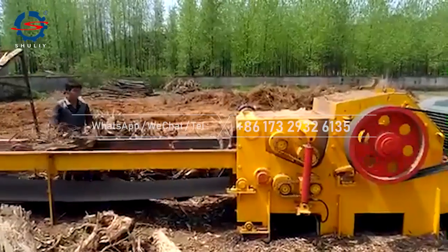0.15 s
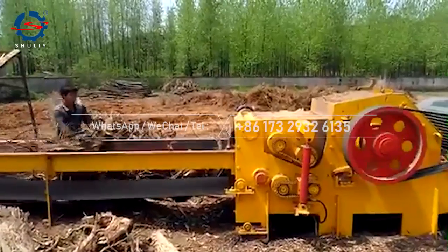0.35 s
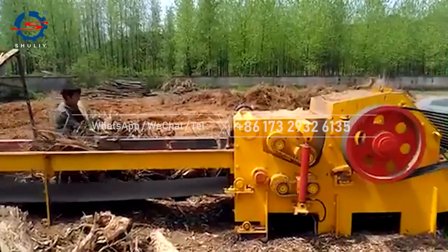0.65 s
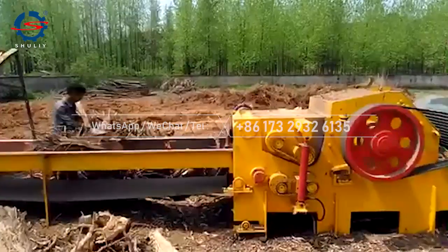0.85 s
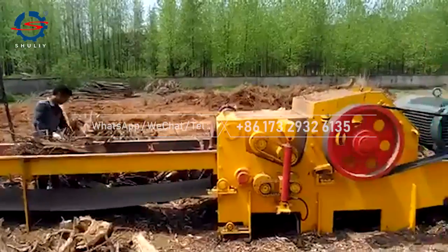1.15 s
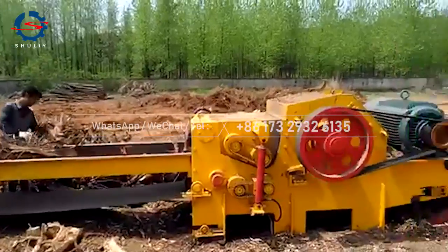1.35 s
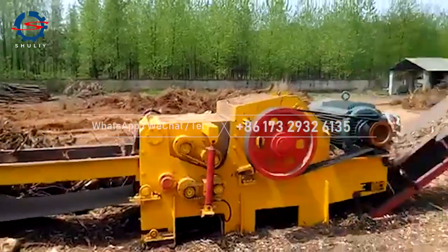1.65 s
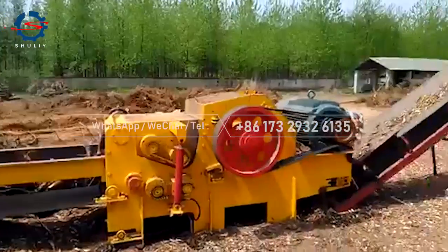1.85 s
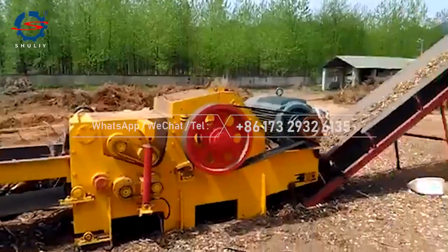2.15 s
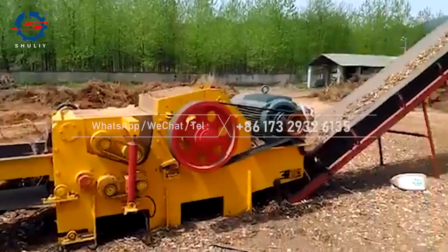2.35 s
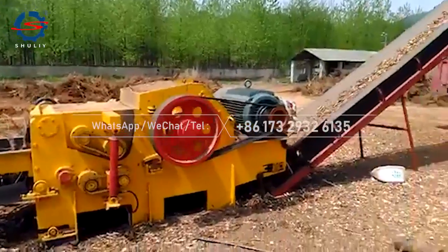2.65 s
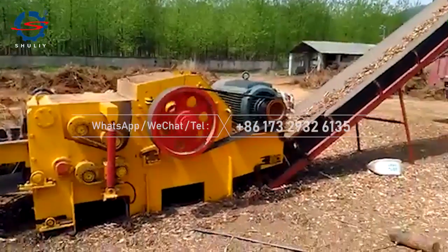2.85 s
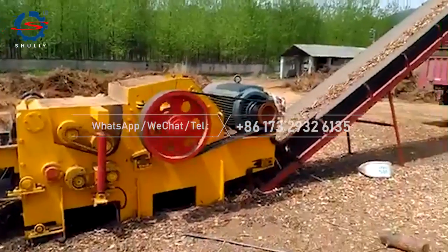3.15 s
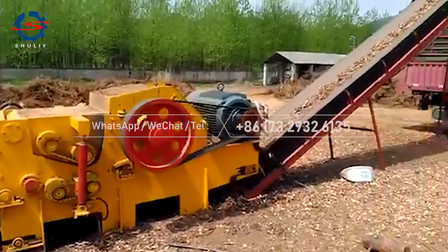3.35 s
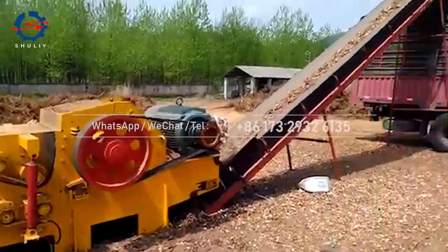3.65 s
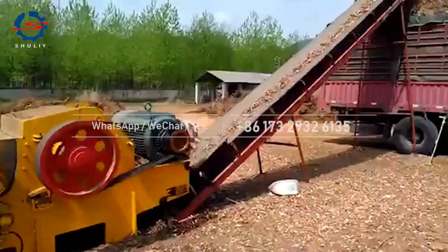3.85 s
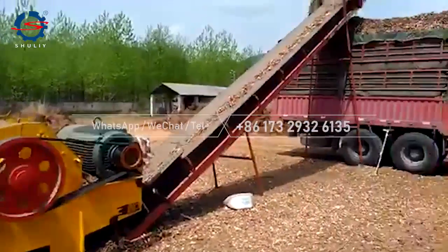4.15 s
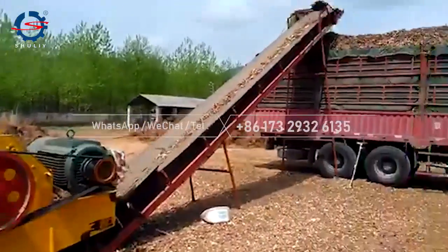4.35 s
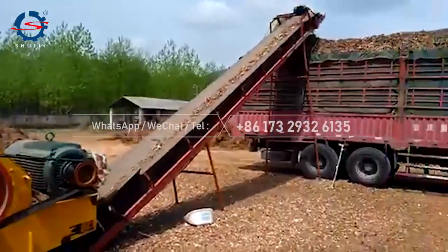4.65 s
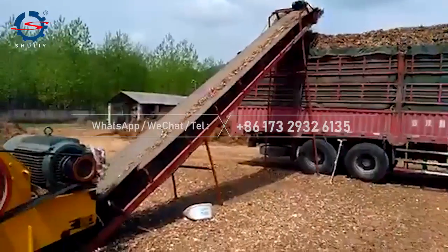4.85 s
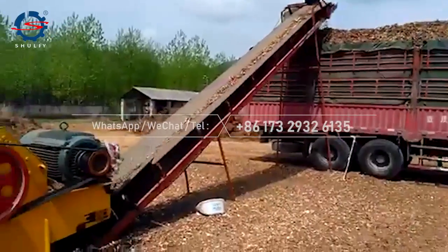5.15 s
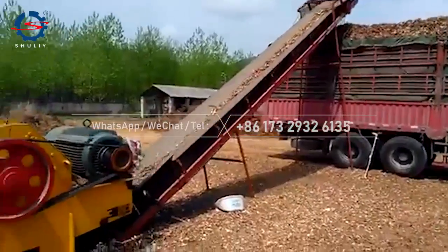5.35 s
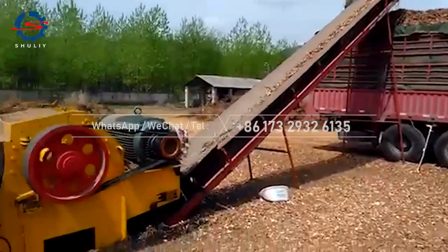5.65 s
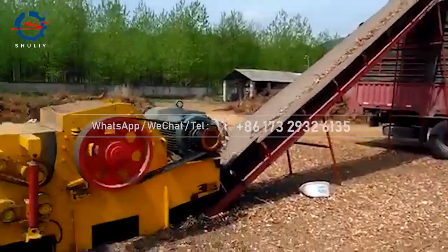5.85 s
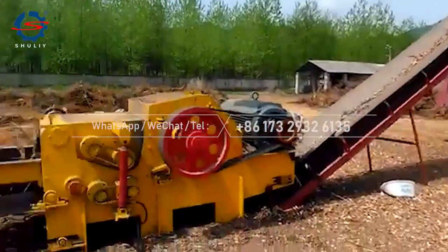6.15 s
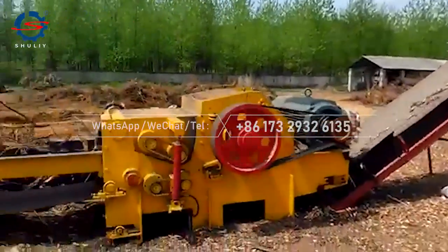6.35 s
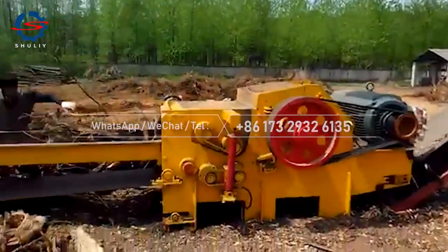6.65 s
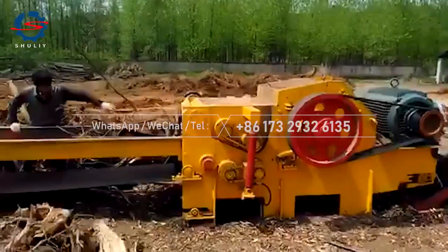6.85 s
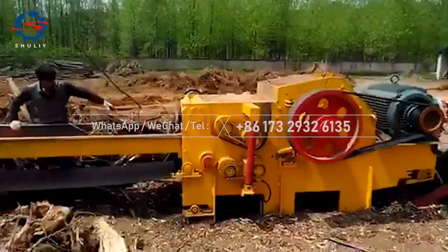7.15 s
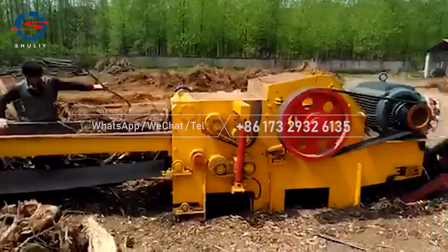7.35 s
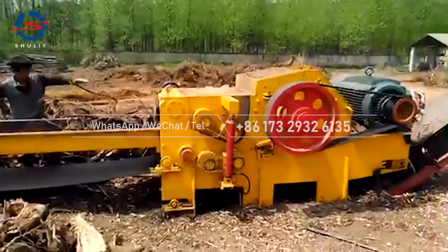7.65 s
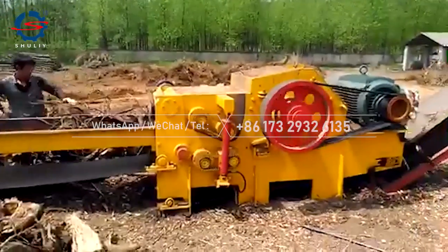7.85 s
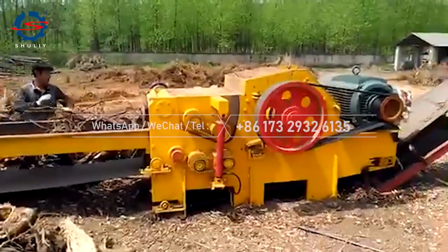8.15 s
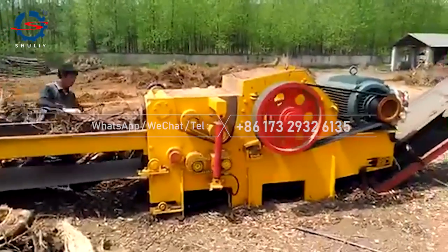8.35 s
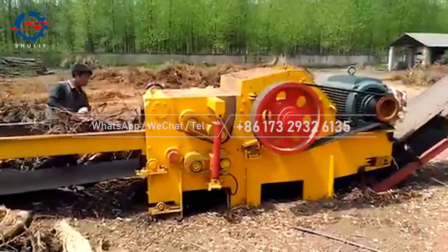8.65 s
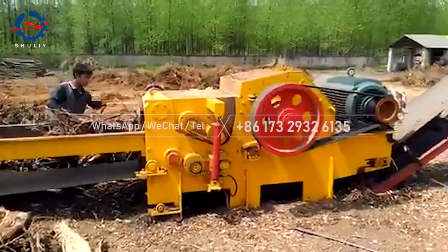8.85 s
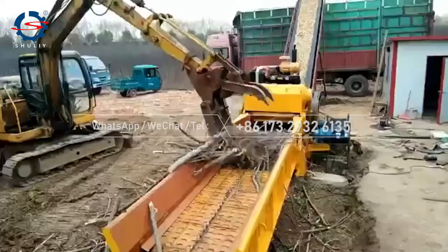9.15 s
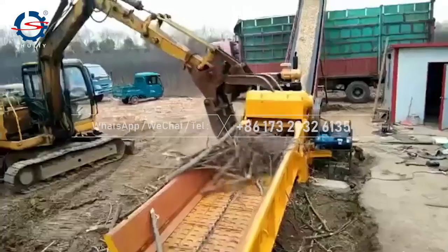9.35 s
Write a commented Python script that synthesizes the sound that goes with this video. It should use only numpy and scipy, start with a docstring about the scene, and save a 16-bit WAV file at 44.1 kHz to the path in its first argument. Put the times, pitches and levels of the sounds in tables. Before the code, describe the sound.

Dense cracking and hollow wood knocks over a low drum rumble thin out into chirping metallic squeaks and high squeals, ending in an abrupt cut.

```python
"""A drum wood chipper: chops come in bursts, each a splintering noise burst shaped by resonances of the steel casing,
with a clean ring and crackles. The knife drum throbs in multiples of the knife rate; frame rumble, churning chips
and chip spray are filtered noise. Heavy wood knocks as damped low modes. Conveyor rollers squeak and dry bearings
squeal as stick-slip tones smeared into narrow noise, below a thin high whine. The sound ends in an abrupt cut."""
import sys
import numpy as np
from scipy import signal
from scipy.fft import rfft, irfft, next_fast_len
from scipy.io import wavfile
from scipy.ndimage import uniform_filter1d, map_coordinates

SR = 44100
rng = np.random.default_rng(int(sys.argv[2]) if len(sys.argv) > 2 else 0)


def int16_out(signal):
    """Quantize to a 16-bit WAV file."""
    q = np.round(np.clip(np.atleast_2d(signal).T, -1, 1) * 32767)
    wavfile.write(sys.argv[1], SR, q.astype(np.int16))


N = 418950

# Modes of the steel casing. Each row: frequency in Hz, width in Hz, relative height in dB.
CASING_MODES = [(387, 67, 12.5), (507.6, 10, 21), (600, 58, 9.5), (733, 8.9, 3.5), (833, 110, 7),
                (917, 16, -1.5), (1124, 14, 10.5), (1300, 63, 12), (1445, 15, 14), (1596, 18, 0.5),
                (1846, 28, 5.5), (2006, 6.3, 13), (2397, 42, 10), (2530, 26, 13), (2660, 13, 10.5),
                (2912, 26, 6), (3294, 58, 5.5), (4106, 30, 9)]


def amp(db):
    """Level to gain: 20 dB are a factor of ten in amplitude."""
    return np.exp(np.asarray(db) * np.log(10) / 20)


def unit(x):
    """Normalisation to an rms of 1, so that a later gain sets the level."""
    return x / np.sqrt(np.mean(x ** 2) + 1e-20)


def along(points, hz):
    """A spectrum interpolated on a logarithmic frequency axis."""
    f, v = np.transpose(points)
    return np.interp(np.log(hz + 1), np.log(f + 1), v)


def curves(rows, t):
    """Piecewise linear courses in time, one for each column after the first."""
    s, *columns = np.transpose(rows)
    return [np.interp(t, s, column) for column in columns]


def wobble(rate, n=N):
    """Slow random modulation: a smooth spline through random knots, rate of them a second."""
    step = max(1, int(SR / rate / 12))
    at = np.arange(0, n + step, step)
    knots = rng.standard_normal(n // 30 + 4)
    coarse = map_coordinates(knots, [at * rate / SR], order=2, mode="wrap", prefilter=False)
    return np.interp(np.arange(n), at, coarse)


def filtered(x, response):
    """Linear filtering: the spectrum of x times a response of frequency."""
    m = next_fast_len(len(x) + 4096)
    spectrum = rfft(x, m) * response(np.fft.rfftfreq(m, 1 / SR))
    return irfft(spectrum, m)[:len(x)]


def hump(f, hz, width_hz, height):
    """A Lorentzian resonance curve, its height reached at hz."""
    return height / (1 + ((f - hz) / (width_hz / 2)) ** 2)


def grainy(n, lumps_db, rate):
    """Amplitude-modulated noise: white noise whose strength varies at random."""
    return rng.standard_normal(n) * amp(lumps_db * wobble(rate, n))


def patchy(x, patchy_db, size=512):
    """Random gain over time and frequency; a larger window makes its patches narrower and longer."""
    z = signal.stft(x, nperseg=size)[2]
    field = uniform_filter1d(uniform_filter1d(rng.standard_normal(z.shape), 4, 0), 6, 1)
    return signal.istft(z * amp(patchy_db * unit(field)), nperseg=size)[1][:len(x)]


def add(track, s, sound):
    """Superposition: mixes a sound into the track at time s."""
    part = track[round(s * SR):][:len(sound)]
    part += sound[:len(part)]


def bite(t, attack, length, t60):
    """Envelope of a driven, damped body: exponential rise, hold, exponential decay."""
    return (1 - np.exp(-t / attack)) * amp(-60 * np.maximum(t - length, 0) / t60)


def whistle(hz, clear, width_hz):
    """A stick-slip tone, part steady, part random sidebands; returns its complex grip and turning phase."""
    smear = [unit(wobble(width_hz, len(hz))) + 0.4 * unit(wobble(4.9 * width_hz, len(hz))) for _ in range(2)]
    grip = clear + (1 - clear) * (smear[0] + 1j * smear[1])
    return grip, np.exp(2j * np.pi * np.cumsum(hz) / SR)


def swaying_gain(rows):
    """Slow gain modulation: a given course of level plus an independent random sway."""
    sway_db, sway_per_s = 1.5, 7  # rms sway, random knots a second
    return amp(curves(rows, np.arange(N) / SR)[0] + sway_db * unit(wobble(sway_per_s)))


def chip_spray():
    """Many small chip impacts on the belt merge into high-pitched band noise."""
    # Each row: frequency in Hz, relative spectrum in dB.
    spray_spectrum = [(2350, -41.5), (4000, -18.5), (4990, -18), (5990, -11), (6780, 2), (8540, -1.5),
                      (9780, -5), (11300, -19), (13600, -28), (14500, -20)]
    # Each row: time in seconds, level in dB before the sway.
    spray_level = [(0.0, -44), (0.17, -49.5), (2.1, -49), (2.33, -46), (2.92, -46.5), (3.1, -43.5),
                   (3.44, -45.5), (3.74, -44), (5.2, -44.5), (5.28, -39.5), (6.02, -49), (6.24, -40.5),
                   (7.11, -43.5), (7.31, -51.5), (7.56, -63.5), (7.78, -37), (8.16, -45), (8.9, -46.5)]
    noise = patchy(grainy(N, lumps_db=2.6, rate=150), patchy_db=3.5)
    spray = filtered(noise, lambda f: amp(along(spray_spectrum, f)))
    return swaying_gain(spray_level) * unit(spray)


def chip_churn():
    """Chips churning in the casing: broadband excitation coloured by the casing's resonances."""
    # Each row: frequency in Hz, relative spectrum in dB.
    churn_spectrum = [(88, -25.5), (150, 4.5), (201, -5.5), (345, -4), (435, -15.5), (819, -12),
                      (1520, -22), (2770, -22), (3660, -24), (5300, -47), (6000, -47), (7800, -90.5),
                      (13200, -120)]
    # Each row: time in seconds, level in dB before the sway.
    churn_level = [(0.0, -26.5), (0.37, -26), (1.19, -38), (2.23, -33.5), (2.53, -29.5), (2.65, -33.5),
                   (3.02, -28), (3.22, -35), (3.64, -31), (3.87, -36.5), (4.46, -35), (4.64, -36),
                   (5.95, -37.5), (6.69, -39), (7.06, -39.5), (8.21, -37.5), (8.38, -37), (8.9, -36)]

    def colour(f):
        """Resonant colouring: the broad spectrum with softened casing modes."""
        return amp(along(churn_spectrum, f) + 0.43 * sum(hump(f, *mode) for mode in CASING_MODES))

    noise = patchy(grainy(N, lumps_db=1.5, rate=56), patchy_db=4, size=2048)
    return swaying_gain(churn_level) * unit(filtered(noise, colour))


def knife_drum():
    """A periodic force: harmonics of the knife rate, and frame rumble modulated at the same rate."""
    # Each row: multiple of the knife rate, relative level in dB.
    throb_partials = [(1, -29), (2, -1), (3, 7.5), (4, 3), (5, -16), (6, -17.5), (7, -2.5), (8, -4.5),
                      (9, -21)]
    # Each row: time in seconds, level of the throb in dB.
    throb_level = [(0, -33), (1.5, -30), (3, -34), (4.5, -32.5), (6, -32), (7.5, -30), (9, -32)]
    # Each row: frequency in Hz, relative spectrum in dB.
    rumble_spectrum = [(20, -12.5), (45, -9), (75, -1.5), (103, 2.5), (140, -8.5), (200, -14), (300, -17),
                       (500, -72.5)]
    # Each row: time in seconds, level of the frame rumble in dB before the sway.
    rumble_level = [(0.0, -28.5), (0.58, -25), (0.75, -31), (0.9, -21.5), (1.31, -31), (1.61, -27.5),
                    (1.66, -41), (1.96, -29), (2.72, -31.5), (2.94, -26.5), (3.24, -39), (3.37, -37),
                    (3.95, -41), (3.97, -28), (4.93, -39), (7.47, -30), (7.77, -33.5), (7.87, -24),
                    (8.3, -28), (8.37, -54), (8.6, -23), (8.75, -38), (9.0, -40.5), (9.03, -44)]
    knife_hz = 18.72  # mean knife passes a second
    t = np.arange(N) / SR
    turns = knife_hz * t + 0.014 * wobble(4.0)  # in knife passes, slightly uneven
    throb = sum(amp(db + 1.3 * wobble(2.7)) * np.sin(2 * np.pi * k * turns) for k, db in throb_partials)
    pulse = 1 + 0.55 * np.cos(2 * np.pi * (turns - 0.3))
    noise = patchy(grainy(N, lumps_db=0.5, rate=37), patchy_db=3, size=4096)
    rumble = filtered(noise * pulse, lambda f: amp(along(rumble_spectrum, f)))
    return amp(curves(throb_level, t)[0]) * unit(throb) + swaying_gain(rumble_level) * unit(rumble)


def whine():
    """A narrow-band tone under random frequency and amplitude modulation: it wavers, comes and goes."""
    # Each row: time in seconds, pitch in Hz before its shiver, level in dB before its flutter.
    whine_course = [(1.6, 14000, -86.5), (1.69, 13400, -47.5), (2.0, 13460, -53), (2.04, 13430, -73),
                    (2.49, 12600, -80.5), (2.7, 13400, -54), (3.01, 13100, -45.5), (3.37, 13200, -64),
                    (4.0, 12900, -54.5), (4.419, 12939, -63), (4.59, 13150, -48), (4.78, 13460, -86),
                    (4.909, 13200, -45.5), (5.2, 13500, -58), (5.39, 12935, -51.5), (5.83, 13350, -68.5),
                    (6.11, 13150, -53), (6.55, 13040, -47.5), (7.28, 13105, -70), (7.43, 13321, -114),
                    (7.77, 13000, -47), (8.25, 13100, -65.5), (8.38, 13033, -65), (8.44, 13540, -81)]
    out, t = np.zeros(N), np.arange(whine_course[0][0], whine_course[-1][0], 1 / SR)
    hz, db = curves(whine_course, t)
    grip, turn = whistle(hz * (1 + 0.004 * unit(wobble(18, len(t)))), clear=0.4, width_hz=260)
    flutter_db = 3.9 * unit(wobble(16, len(t)))
    add(out, t[0], amp(db + flutter_db) * unit(np.real(grip * turn)))
    return out


def squeals():
    """Stick-slip in dry bearings: gliding notes swell to a crest and sink; the higher, the fuzzier."""
    # Each row: start in seconds, swell in seconds, fade in seconds, first pitch in Hz, last pitch in Hz,
    # crest level in dB before the flutter, rise to the crest in dB, fall after it in dB.
    squeal_notes = [(3.003, 0.057, 0.24, 6850, 6820, -28.5, 18, 18),
                    (3.149, 0.092, 0.23, 5640, 5330, -28, 11, 5.5),
                    (3.426, 0.029, 0.11, 5310, 5330, -24.5, 2, 29),
                    (4.409, 0.12, 0.35, 6990, 6780, -28.5, 14, 3),
                    (4.791, 0.11, 0.15, 6890, 6780, -28, 3, 1),
                    (4.678, 0.19, 0.15, 5700, 5510, -31.5, 15, 2.5),
                    (5.005, 0.079, 0.43, 5570, 5450, -31.5, 1, 15),
                    (5.001, 0.098, 0.11, 6820, 6960, -25.5, 12, 16.5),
                    (5.048, 0.16, 0.08, 11000, 11900, -42.5, 4.5, 12),
                    (5.17, 0.099, 0.013, 7000, 6800, -24, 11, 6),
                    (5.278, 0.022, 0.15, 6730, 6840, -26.5, 3, 9),
                    (5.509, 0.02, 0.11, 7020, 6960, -30, -5, 19),
                    (6.53, 0.027, 0.14, 11600, 10900, -35, 25, 19),
                    (6.752, 0.065, 0.049, 6350, 6500, -24.5, 19, -5),
                    (6.86, 0.069, 0.12, 6620, 6960, -22.5, 17.5, 12),
                    (7.061, 0.11, 0.17, 6860, 6850, -28, 9, 31),
                    (7.085, 0.027, 0.12, 5450, 5500, -28, 16, 20),
                    (7.062, 0.0067, 0.017, 6800, 6800, -24, 17, 1),
                    (7.603, 0.048, 0.033, 7530, 7550, -22.5, 26, 29),
                    (7.7, 0.021, 0.058, 6830, 7300, -33, 3, 2),
                    (7.845, 0.0094, 0.035, 7950, 7750, -24, 4, 6),
                    (7.879, 0.016, 0.045, 7600, 7850, -26.5, 6, 26),
                    (7.972, 0.02, 0.064, 11800, 11630, -40, 15, 4),
                    (7.998, 0.012, 0.018, 7150, 7100, -34.5, 5, 7),
                    (8.02, 0.011, 0.018, 6750, 6650, -35, 2.5, 5),
                    (8.103, 0.012, 0.015, 6200, 6100, -29, 0, 5),
                    (8.072, 0.03, 0.075, 11700, 12000, -36, 4, 21),
                    (8.286, 0.033, 0.015, 6980, 6850, -30.5, 22, 3),
                    (8.343, 0.016, 0.036, 7150, 7000, -31, 6, 11),
                    (8.409, 0.017, 0.064, 6950, 6950, -32, -1, 14),
                    (8.591, 0.013, 0.026, 7060, 6850, -29, 6, 19),
                    (8.64, 0.024, 0.023, 6910, 6970, -30.5, 10, 10),
                    (8.945, 0.085, 0.034, 7070, 6810, -26, 16, 4)]
    flutter_db, jitter = 3, 0.0049  # rms unsteadiness of the grip; rms share of the pitch
    out = np.zeros(N)
    for start, swell, fade, first_hz, last_hz, db, rise_db, fall_db in squeal_notes:
        end = swell + fade
        t = np.arange(0, end + .1, 1 / SR)
        stray = 0.006 * wobble(10, len(t)) + jitter * unit(wobble(60, len(t)))  # slow drift and shiver
        hz = np.interp(t, [0, end], [first_hz, last_hz]) * (1 + stray)
        swell_db = np.interp(t, [0, swell, end], [db - rise_db, db, db - fall_db])
        swell_db += flutter_db * unit(wobble(44.7, len(t)))
        edges = np.clip(np.minimum(t, end - t) / 0.01, 0, 1)
        grip, turn = whistle(hz, clear=0.58, width_hz=200 * (first_hz / 6000) ** 1.4)
        add(out, start, amp(swell_db) * edges * unit(np.real(grip * turn)))
    return out


def squeaks():
    """Stick-slip: a roller catches with a scrape, its pitch sinks to a note, and the frame resonates."""
    # Each row: start in seconds, nominal peak level in dB, settled pitch in Hz,
    # scrape over the note in dB, length in seconds.
    squeak_notes = [(3.056, -10, 3526, -5.5, 0.018), (3.076, -2.5, 3483, -17, 0.026),
                    (3.112, -14, 3470, -5, 0.026), (3.41, -5, 3510, -15.5, 0.03),
                    (3.592, -6.5, 3485, -10, 0.039), (3.598, -19, 5010, -18.5, 0.017),
                    (3.595, -21.5, 5400, -16, 0.012), (3.751, -6, 3515, -10.5, 0.07),
                    (3.913, -17.5, 3550, 0.5, 0.035), (4.121, -9, 3460, -10, 0.042),
                    (4.244, -24.5, 3690, -25.5, 0.061), (4.286, -5.5, 3440, -12, 0.045),
                    (4.464, -16, 3530, -5.5, 0.012), (4.576, -20.5, 3950, -7, 0.014),
                    (4.624, -11, 3780, -6.5, 0.022), (4.649, -4.5, 3467, -20, 0.035),
                    (5.171, -2.5, 3505, -32, 0.042), (5.505, -8, 3500, -11.5, 0.073),
                    (5.701, -0.5, 3530, -17, 0.034), (5.709, -21, 3980, -36, 0.025),
                    (5.723, -12, 4260, -18, 0.011), (5.851, -20.5, 3620, -2.5, 0.05),
                    (5.859, -15, 3780, -17, 0.012), (6.018, -14.5, 3580, 1.5, 0.12),
                    (6.029, -18, 5200, -45, 0.027), (6.044, -11.5, 3810, -24, 0.019),
                    (6.057, -16.5, 3970, -23, 0.012), (6.095, -20.5, 4880, -21, 0.021),
                    (6.06, -3.5, 3470, -11.5, 0.029), (6.199, -5.5, 3690, -23.5, 0.024),
                    (6.217, -3, 3730, -19.5, 0.0042), (6.247, -17, 3710, -25, 0.009),
                    (6.382, -13, 3665, -8.5, 0.021), (6.402, -8.5, 3514, -9, 0.033),
                    (6.41, -17, 4400, -21, 0.016), (6.567, -3, 3770, -17.5, 0.0042),
                    (6.922, -12, 3600, 0, 0.021), (6.94, -3.5, 3487, -17, 0.033),
                    (6.957, -18, 4800, -6.5, 0.017), (7.105, -20, 3930, -6, 0.015),
                    (7.111, -5, 3520, -14.5, 0.039), (7.519, -17.5, 3595, -2.5, 0.013),
                    (7.521, -29, 4850, -7, 0.013), (7.998, -31.5, 4820, -9, 0.014),
                    (7.642, -13.5, 3770, -14.5, 0.0076), (7.695, -12, 3506, -10, 0.026),
                    (7.829, -11.5, 3700, -19, 0.0089), (7.985, -13, 3740, -8, 0.015),
                    (8.245, -26, 3820, -11, 0.0078), (8.252, -23, 3130, -5, 0.01),
                    (8.333, -17, 3670, -8, 0.0081), (8.353, -12.5, 3530, -6.5, 0.017)]
    crest_db = 6.5  # peak of note, ring and scrape together over the note alone
    clear_s = 0.045  # a shorter squeak never settles into a clean note
    catch_share, catch_s = 0.41, 0.029  # attack as a share of the length, and its limit
    frame_hz, frame_width_hz = 3510, 400  # the frame rings out mostly notes near its own pitch
    out, t = np.zeros(N), np.arange(SR // 3) / SR
    for s, db, hz, scrape_db, length in squeak_notes:
        upper_hz = rng.uniform(3655.6, 5210)  # where the second contact scrapes
        t60 = 0.29 + 3.5 * length  # a longer squeak rings longer
        settled = np.clip(length / clear_s, .3, 1)
        sinking_hz = hz * (1 + 0.04 * np.exp(-t / 0.00742))
        grip, turn = whistle(sinking_hz, clear=0.93 * settled, width_hz=90 / settled)
        blur = 0.25 + 0.32 * unit(wobble(232.5, len(t)))  # the ringing frame beats unevenly

        def scrape_band(f):
            """Contact resonances over a noise floor, with a treble roll-off."""
            contacts = hump(f, 1.012 * hz, 680, 35.8) + hump(f, upper_hz, 410, 18.6)
            treble = hump(f, 7030, 1200, 22) + hump(f, 9540, 4700, 11)
            return amp(-46 + contacts + treble) / (1 + (f / 11800) ** 8)

        scrape = unit(filtered(grainy(len(t), lumps_db=3.5, rate=110), scrape_band))
        scrape *= amp(scrape_db) * bite(t, 0.0096, 0.0022, t60)
        attack = min(catch_share * length, catch_s)
        note = bite(t, attack, length, 0.1 * settled) * grip * (turn + amp(-14) * turn ** 2)  # with octave
        frame_gain = hump(hz, frame_hz, frame_width_hz, 0.42)
        ring = frame_gain * bite(t, 0.021, length, t60) * blur * turn
        add(out, s, amp(db - crest_db) * ((note + ring).real + scrape))
    return out


def thuds():
    """Impulse response of heavy wood: a log end strikes the feed table and two low modes die quickly."""
    # Each row: start in seconds, level in dB, pitch of the upper mode in Hz.
    knocks = [(0.552, -10, 184), (0.821, -2.5, 237), (2.037, -12, 267), (1.298, -21, 282), (1.416, -2, 340),
              (2.74, -8, 117), (2.941, -6, 140), (3.115, -6.5, 307), (3.382, -9.5, 135), (3.492, -5.5, 392),
              (3.996, 1.5, 392), (4.032, -7.5, 294), (4.229, -8.5, 267), (6.673, -11, 260),
              (6.892, -15.5, 262), (6.976, -24, 137), (7.813, -8, 121.4), (8.116, -15.5, 271),
              (8.316, -10, 305), (8.365, -9.5, 300), (8.61, -14, 139.6), (8.796, -14, 309),
              (8.829, -9.5, 114)]
    decay_cycles = 24  # swings of the upper mode until a knock has decayed by 60 dB
    out, t = np.zeros(N), np.arange(SR // 4) / SR
    for s, db, hz in knocks:
        pair = 0.41 * np.sin(2 * np.pi * hz * t) + 0.27 * np.sin(2 * np.pi * 0.814 * hz * t)
        add(out, s, amp(db) * bite(t, 0.005, 0.0046, decay_cycles / hz) * pair)
    return out


def crackle(n, weights, t60, count):
    """Modal impacts: single splinters strike ever more weakly, each ringing one slightly mistuned mode."""
    stray, spread_db = 0.054, 2.5  # largest share of pitch; dB per natural-log unit of the draw
    longest_t60, shortening_db = 0.057, 13  # s; the shortest ring is this many dB shorter
    u, draw = np.arange(SR // 40) / SR, rng.uniform(0, 1, (count, 5))
    mode = (draw[:, 0] * len(CASING_MODES)).astype(int)
    hz = np.array(CASING_MODES)[mode, 0] * (1 + stray * (2 * draw[:, 1] - 1))
    late = draw[:, 2] * min(t60 / 2, n / SR - u[-1] - 1 / SR)
    size = weights[mode] * amp(-60 * late / t60 - spread_db * np.log(draw[:, 3] + .08))
    life = amp(-shortening_db * draw[:, 4:])  # some ring, some only snap, and those the harder
    envelope = bite(u, 0.002 * life, 0, longest_t60 * life) * (1 - u / u[-1])
    rings = size[:, None] / np.sqrt(life) * envelope * np.sin(2 * np.pi * hz[:, None] * u)
    at = (late * SR).astype(int)[:, None] + np.arange(len(u))
    return np.bincount(at.ravel(), rings.ravel(), n)[:n] / np.sqrt(np.mean(weights ** 2))


def casing_knock(u, gains):
    """Modal synthesis: damped casing modes, each struck with a random strength and sign."""
    wood_damps_hz = 25.2  # wood pressed on the casing widens its modes
    knock = np.zeros(len(u))
    for gain, (hz, width_hz, _) in zip(gains, CASING_MODES):
        mistuned_hz = hz * (1 + 0.0084 * rng.standard_normal())
        decay = np.exp(-np.pi * (width_hz + wood_damps_hz) * u)
        knock += gain * rng.uniform(-0.76, 1) * decay * np.sin(2 * np.pi * mistuned_hz * u)
    return (1 - np.exp(-u / 0.00078)) * knock / knock[:SR // 50].std()


def chops():
    """Source and resonator: a snap and splintering noise excite casing modes at random strengths."""
    # Each row: start in seconds, nominal peak level in dB, loudest ring in Hz, how far it stands out in dB,
    # brightness in dB per octave, nominal 60 dB decay in seconds.
    chop_rows = [(0.004, -7.5, 2160, 6, 2, 0.51), (0.091, -19.5, 682, 11, 2, 0.79),
                 (0.122, -16.5, 1610, 8, 5, 0.36), (0.149, -10, 2440, 11, 2.5, 0.46),
                 (0.175, -11, 2060, 11, 5.5, 0.58), (0.229, -10.5, 673, 12, 2, 0.34),
                 (0.315, -9, 727, 12.5, 0.5, 0.2), (0.358, -10.5, 2950, 13.5, -4, 0.5),
                 (0.392, -10, 3090, 11, 2, 0.44), (0.409, -6, 2330, 6.5, 1.5, 0.3),
                 (0.441, -13.5, 1884, 12.5, 1.5, 0.61), (0.468, -9, 1206, 13, 4, 0.35),
                 (0.495, -12, 3000, 3.5, 2.5, 0.19), (0.516, -20.5, 1905, 20.5, -0.5, 0.69),
                 (0.597, -18.5, 574, 9, 6, 0.88), (0.652, -14, 1370, 5, 5, 0.22),
                 (0.726, -22, 3170, 10.5, 16.5, 0.25), (0.752, -12.5, 2600, 10.5, 4.5, 0.26),
                 (0.816, -15, 773, 10.5, 6.5, 0.65), (0.837, -8, 2376, 11.5, -2.5, 0.59),
                 (0.9, -11.5, 1030, 10.5, -3, 0.44), (0.975, -17, 2740, -1, 8.5, 0.19),
                 (1.003, -8, 2420, 6.5, 7.5, 0.31), (1.091, -24, 1970, 14.5, 4, 0.39),
                 (1.179, -16, 1900, 15.5, 12, 0.21), (1.234, -24, 4280, 4, 6, 0.72),
                 (1.374, -7, 562, 8, 2, 0.72), (1.391, -13.5, 1937, 15.5, -2, 0.77),
                 (1.425, -10.5, 1310, 12.5, 8.5, 0.18), (1.455, -19, 2390, 17, -2, 0.58),
                 (1.553, -22.5, 2100, 8.5, 1.5, 0.69), (1.701, -8.5, 2620, 7, 2, 0.5),
                 (1.789, -19.5, 4420, 14, 1.5, 0.28), (1.822, -16, 660, 9, 3, 0.88),
                 (1.853, -19, 2650, 8.5, 9.5, 0.45), (1.916, -21, 586, 15, -8, 1),
                 (2.034, -16, 1098, 5.5, 3, 0.99), (2.103, -19, 2040, -2, 2, 0.67),
                 (2.122, -13, 2680, 19, 5, 0.52), (2.13, -12, 1428, 12, 5.5, 0.54),
                 (2.175, -9, 1104, 5, 1.5, 0.45), (2.195, -9.5, 2025, 6.5, 4, 0.59),
                 (2.304, -15.5, 1450, 3, -1, 0.61), (2.389, -8, 804, 7.5, 5.5, 0.31),
                 (2.516, -19, 2630, 8, 7, 0.93), (2.554, -10, 1445, 11.5, -1.5, 0.51),
                 (2.661, -17.5, 2550, 17, 6.5, 0.39), (2.976, -22.5, 1426, 14.5, 13.5, 1),
                 (3.109, -13.5, 3000, 5.5, 9.5, 0.77), (3.371, -21, 990, 9.5, 7, 0.68),
                 (3.415, -18, 1390, 22, -3, 0.42), (3.449, -14.5, 1558, 12.5, 0, 0.51),
                 (3.677, -22, 1470, 10, 5, 1), (3.783, -16.5, 1400, 7.5, 9.5, 0.93),
                 (3.958, -28, 1710, 17.5, -3, 1), (4.024, -23.5, 1615, 23.5, -1.5, 0.27),
                 (4.223, -26.5, 960, 14, 4, 0.33), (4.344, -22.5, 1624, 17, 10, 0.33),
                 (4.45, -29, 950, 16, -5.5, 0.4), (4.56, -21, 1680, 24, 6, 0.13),
                 (4.582, -15.5, 2376, 17, 11, 0.3), (4.598, -20, 1700, 17, 1.5, 0.68),
                 (5.085, -21, 1905, 12.5, 12.5, 0.49), (5.112, -13, 2360, 10, 7, 0.37),
                 (5.124, -16.5, 1504, 12.5, 2, 0.82), (5.319, -19.5, 2470, 15.5, -1.5, 0.42),
                 (5.547, -19.5, 2340, 9, 5, 0.39), (5.836, -29.5, 1273, 17.5, 7.5, 0.54),
                 (5.992, -31.5, 770, 28, -0.5, 0.37), (6.411, -24, 1010, 7.5, -9, 0.87),
                 (6.52, -27, 782, 16, -5, 0.69), (6.565, -21.5, 840, 8.5, -13.5, 0.7),
                 (6.683, -17, 730, 2, -20, 0.75), (6.74, -20.5, 695, 14, -15, 0.42),
                 (6.801, -18.5, 2570, 16, 4, 0.23), (6.802, -18, 1200, 6, 5, 0.3),
                 (7.533, -26, 2010, 21, -5.5, 0.38), (7.991, -29, 795, 17, -12.5, 0.4),
                 (8.251, -29, 1980, 15, -1, 0.24), (8.312, -17, 513, 12, -7, 0.48),
                 (8.352, -27, 1580, 27, 2.5, 0.2), (8.358, -17.5, 4580, 18.5, 18.5, 0.14),
                 (8.558, -26.5, 820, 20, -7.5, 0.32), (8.663, -28.5, 577, 14.5, -5.5, 0.27),
                 (8.69, -27, 4580, 11, 18, 0.58), (8.753, -24, 750, 11, 2.5, 0.36),
                 (8.839, -21, 880, 16, 4.5, 0.4), (9.014, -20, 943, 17.5, 8, 0.53)]
    # What a chop excites. Each row: frequency in Hz, relative spectrum in dB.
    casing_spectrum = [(90, -36), (150, 8), (330, 0), (460, -9.5), (710, 4.5), (1200, -5.5), (1670, -5.5),
                       (2500, -8.5), (3000, -10.5), (3400, -16.5), (4200, -17.5), (5200, -25), (5800, -33),
                       (6500, -33), (8500, -33.5), (11000, -59), (14000, -64)]
    faint_db, bite_s, bite_grows_s = -30, 0.0075, 0.00036  # knives stay in a faint chop; more s per dB
    crest_db, knock_db, crackle_db = 11.5, -17.5, -5  # splintering peak over its mean; layer gains
    ring_db, ring_share = -15.5, 0.52  # clean ring: gain before its prominence; share of the decay time
    out, t = np.zeros(N), np.arange(SR // 3) / SR
    u, modes_hz, fade = t[:SR // 14], np.array(CASING_MODES)[:, 0], np.sqrt(1 - t / t[-1])
    for s, db, hz, stands_out_db, tilt, t60 in chop_rows:
        shake = rng.uniform(0.14, 1.32, len(CASING_MODES))

        def broad_db(f):
            """Spectral envelope: casing response, brightness tilt and the loudest resonance."""
            return along(casing_spectrum, f) + tilt * np.log2((f + 50) / 1000) + hump(f, hz, 0.23 * hz, stands_out_db)

        def colour(f):
            """Resonant colouring: the envelope with casing modes at this chop's strengths."""
            return amp(broad_db(f) + sum(g * hump(f, *mode) for g, mode in zip(shake, CASING_MODES)))

        add(out, s, amp(db + knock_db) * casing_knock(u, colour(modes_hz)))
        hold = bite_s + bite_grows_s * (db - faint_db)
        snap = 1 + 0.21 * amp(-60 * t / 0.0095)  # the first fibres break hardest
        splinters = unit(filtered(grainy(len(t), lumps_db=3.5, rate=220), colour))
        splinters *= snap * bite(t, 0.0026, hold, t60) * fade
        ring = (0.98 + 0.85 * unit(wobble(0.054 * hz, len(t)))) * np.sin(2 * np.pi * hz * t)
        ring *= amp(ring_db + stands_out_db) * bite(t, 0.0089, hold, ring_share * t60)
        crackles = amp(crackle_db) * crackle(len(t), amp(broad_db(modes_hz) / 2), t60, count=30)
        add(out, s, amp(db - crest_db) * (splinters + ring + crackles))
    return out


def scene():
    """Superposition of all sources; the colour of churn and chops shifts at random."""
    wood = patchy(chip_churn() + chops(), patchy_db=2.5)
    machine = knife_drum() + chip_spray()
    return (machine + wood + thuds() + squeaks() + squeals() + whine())[None]


def record(dry):
    """Soft saturation in the microphone rounds the tallest peaks; then the cut and a sharp low-pass."""
    end_s, top_hz = 9.066, 14600
    heard = dry[0] / (1 + np.abs(dry[0] / .7) ** 4) ** (1 / 4)
    cut = np.clip((end_s - np.arange(N) / SR) / 0.0057, 0, 1)
    return filtered(heard * cut, lambda f: f < top_hz)[None]


dry = scene()
out = record(dry)
int16_out(out)
```